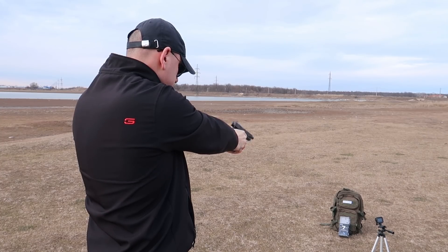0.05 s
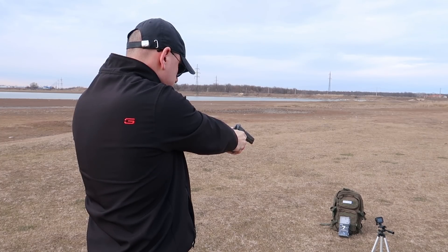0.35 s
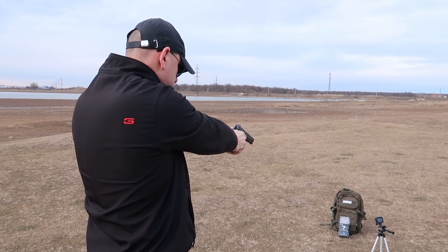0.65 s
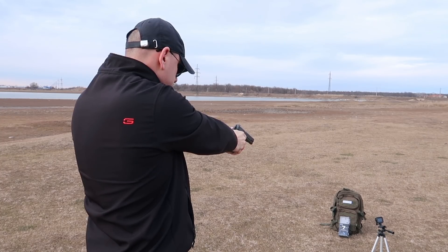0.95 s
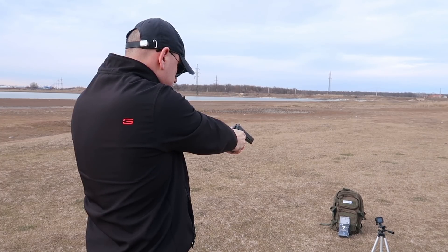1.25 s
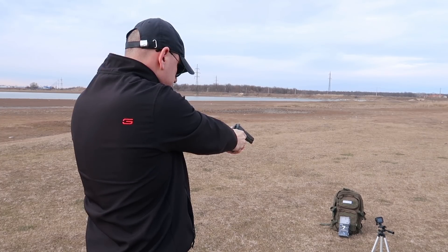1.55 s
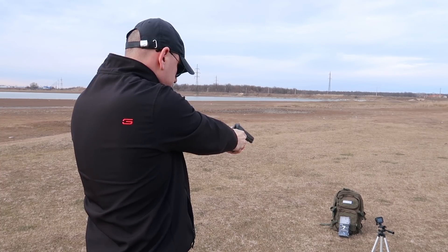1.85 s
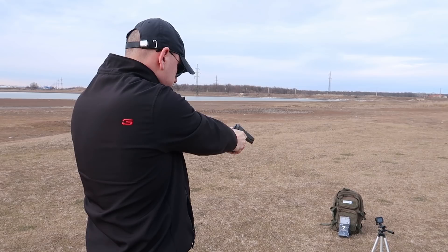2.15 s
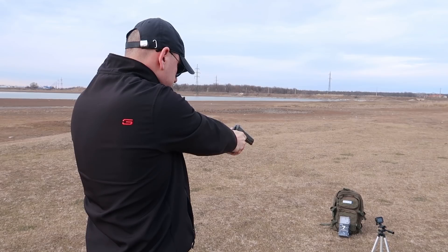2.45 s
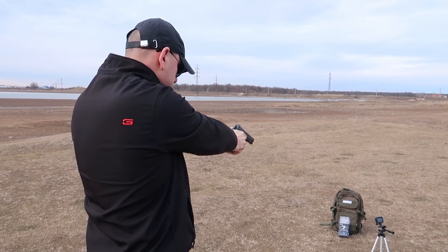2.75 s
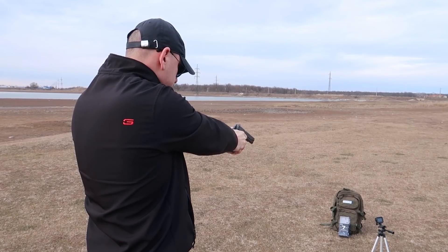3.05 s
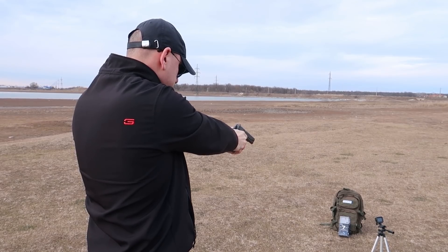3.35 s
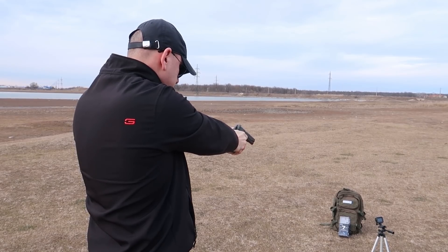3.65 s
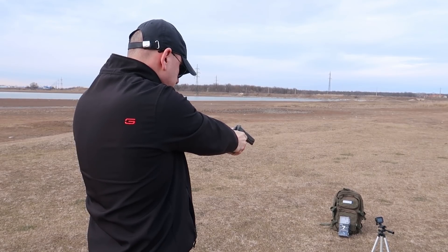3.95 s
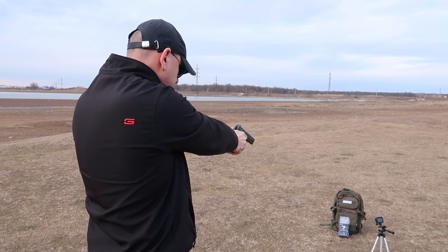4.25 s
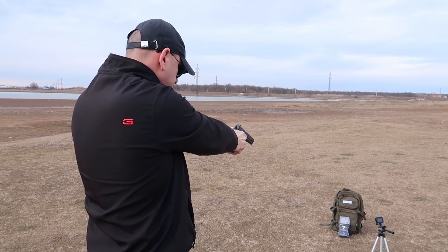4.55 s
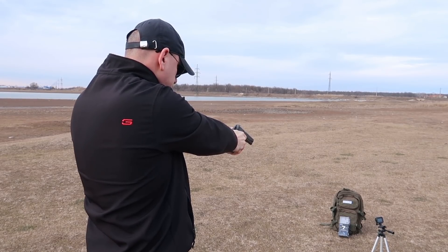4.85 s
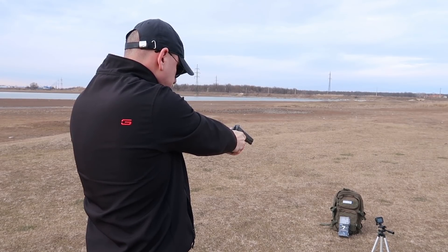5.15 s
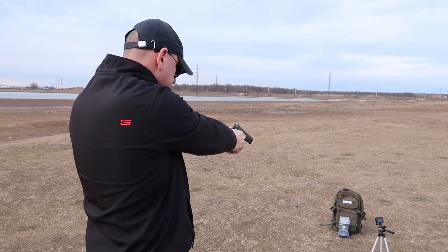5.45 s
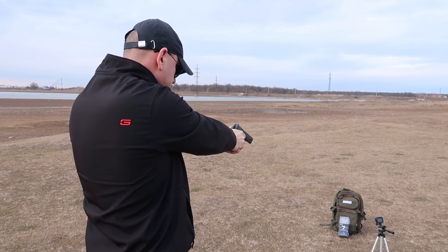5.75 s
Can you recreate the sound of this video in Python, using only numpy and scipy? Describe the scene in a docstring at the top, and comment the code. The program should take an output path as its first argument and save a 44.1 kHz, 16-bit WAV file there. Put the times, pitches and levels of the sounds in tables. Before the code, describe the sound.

Eight snappy airsoft pistol pops with slide clacks and some pellet smacks on a hollow target, in a gusty open field.

```python
"""A gas blowback airsoft pistol fires eight shots in an open field, two spaced apart, then a quicker string.
In each, released gas spits, the pellet leaves with a pop, and the slide racks back and slams shut.
The trigger clicks, and some pellets strike a hollow target and excite the modes of its walls.
The ground reflects every bang, turbulent gusts buffet the two ports of the microphone,
and a far background murmurs."""
import sys
import numpy as np
from scipy import signal
from scipy.fft import rfft, irfft
from scipy.io import wavfile
from scipy.ndimage import map_coordinates

SR = 44100
rng = np.random.default_rng(int(sys.argv[2]) if len(sys.argv) > 2 else 0)


def digitize_waveform(pressure):
    """Quantize a signal to 16-bit integers and store it at the path in sys.argv[1].

    Rows of a 2-D input are taken as channels; values are limited to [-1, 1].
    """
    field = np.atleast_2d(pressure).T
    bounded = np.clip(field, -1, 1)
    quanta = np.round(bounded * 32767).astype(np.int16)
    wavfile.write(sys.argv[1], SR, quanta)


N = 264600
BLOW_SIZE = 8192   # samples
AGE = np.arange(BLOW_SIZE) / SR   # seconds since a blow began

# Levels in the tables are relative: each source adds its own gain.
# shots: (pop time [s], pop level [dB], gas level [dB], hammer level [dB],
#         slide closing time [s], closing level [dB], level to which the background sinks [dB])
SHOTS = [(.1445, 1, -8.5, -5, .2003, -4.5, -80), (1.9238, 2, -12, 2.5, 1.9710, -9.5, -79.5),
         (3.0968, 0, -13, -3, 3.1497, -9.5, -80), (3.4965, -5, -21, -7, 3.5502, -5, -77),
         (3.8497, -4, -19, -6.5, 3.9038, -11.5, -82), (4.2213, -5.5, -23, -19, 4.2743, -7, -82),
         (5.0558, 0, -15, -5, 5.1090, -0.5, -76.5), (5.9182, 3, -12, -9, 5.9708, -1.5, -77)]
# trigger resets and grip clicks: (time [s], level [dB], ring frequency [Hz])
CLICKS = [(.432, -53.5, 4800), (.528, -33.5, 4200), (2.274, -31.5, 4170), (3.2688, -32, 2730),
          (3.6582, -29.5, 2750), (3.9949, -37.5, 2660), (4.358, -51, 1780), (4.389, -30.5, 2420),
          (4.4, -34, 2250), (4.7835, -38, 1800), (5.216, -54, 2700), (5.263, -27, 2700)]
# pellet strikes and rebounds on the target: (time [s], level [dB], ring level [dB], pitch [ratio])
HITS = [(.2225, 0, -5, 1.06), (1.9750, 0, 2.5, 1.02), (2.082, -52, -2, 0.9), (3.1402, 2.5, -1, 1.03),
        (3.1425, -8, -2.5, 0.97), (3.5750, -7, 3.5, 1.0), (3.8944, 4, -4, 1.04), (5.1412, -7, -2, 1.0),
        (5.1446, -9, 4.5, 1.08), (5.1628, -21, -3, 1.0)]
# normal modes: (frequency [Hz], level [dB], time to decay by 60 dB [s])
SLIDE_MODES = [(1420, -26, .032), (1960, -22, .032), (2700, -20, .026), (3200, -15, .028),
               (3650, -23, .026), (4760, -23, .026), (6500, -36, .025), (8160, -35, .022),
               (12400, -36, .025)]
TARGET_MODES = [(437, -19.5, 0.068), (650, -14, 0.03), (820, -20, 0.037), (978, -19, 0.049),
                (1710, -15.5, 0.036), (2250, -10.5, 0.031), (2770, -18.5, 0.0086)]
# spectra of the gas jet, muzzle pop and impacts: (frequency [Hz], spectral density [dB])
GAS_SPECTRUM = [(40, -28.5), (200, -6), (500, -7.5), (850, -5), (1200, -11.5), (2300, -5.5), (3300, -2),
                (4800, -6), (6000, -19.5), (8000, -27), (10200, -37.5), (12600, -22), (16000, -35.5)]
POP_SPECTRUM = [(30, -29), (120, -9), (300, -5.5), (700, -3.5), (1100, -6), (2100, 2.5), (3200, -2.5),
                (5500, -13.5), (7000, -19.5), (10200, -47), (12600, -23), (16000, -36)]
METAL_SPECTRUM = [(60, -38), (500, -27), (1100, -19.5), (1900, -8.5), (3200, -0.5), (4500, -8.5),
                  (5600, -18.5), (8000, -21.5), (10000, -51), (12500, -24), (16000, -35)]
TICK_SPECTRUM = [(100, -18), (600, -6), (1200, -11), (1900, -1.5), (2700, -0.5), (4400, -7), (6000, -17.5),
                 (10000, -36), (12500, -28), (16000, -43)]
SMACK_SPECTRUM = [(60, -38.5), (200, -35), (450, -14.5), (950, -1), (1230, -12.5), (1650, 0), (2300, -0.5),
                  (3400, -2.5), (4500, -14.5), (7000, -21.5), (10000, -42.5), (12500, -32), (16000, -43)]
# spectra of the wind bands, far wash and port hiss: (frequency [Hz], spectral density [dB])
RUMBLE_SPECTRUM = [(15, -19.5), (28, -10.5), (55, -4.5), (90, -2.5), (140, -5), (220, -15), (400, -40.5),
                   (900, -75.5)]
BUFFET_SPECTRUM = [(40, -29), (110, -10), (190, 1), (330, -2), (480, -10), (570, -24), (900, -48.5),
                   (2000, -76.5)]
FLUTTER_SPECTRUM = [(100, -25), (330, 2.5), (470, 1), (600, -6.5), (850, -10.5), (1250, -27), (1900, -45),
                    (4000, -74), (9000, -110)]
FAR_SPECTRUM = [(20, -28), (60, -16.5), (130, -6), (200, -1), (500, 0.5), (950, -1.5), (1300, -8.5),
                (2100, -18.5), (4000, -30.5), (8000, -46), (16000, -70)]
HISS_SPECTRUM = [(100, -1.5), (1500, 0), (4000, -2.5), (8000, -11.5), (11500, -17.5), (16000, -35.5)]
# lead of the left port for direct sound: (frequency [Hz], phase [rad])
PORT_PHASE = [(100, 0), (1200, -.03), (2300, -.07), (3400, -.18), (4400, -.45), (5400, -1.0), (6800, -.3),
              (8200, 1.0), (10000, -.5), (13000, .4), (16000, -.2)]
# difference between the two ports: (frequency [Hz], side minus mid level [dB])
SHOT_WIDTH = [(100, -25), (1000, -25), (2500, -23), (5000, -17), (8000, -9), (13000, -14)]
WIND_WIDTH = [(30, -17.5), (70, -11), (160, -7.5), (380, -5), (950, -0.5), (2400, 1.5)]
FAR_WIDTH = [(30, -27), (400, -24.5), (1000, -17), (2400, -8.5), (6000, -3)]
# light, unceasing breeze: (time [s], rumble level [dB], buffet level [dB])
BREEZE = [(0.0, -54.5, -57.5), (0.324, -47.5, -61.0), (0.861, -58.5, -72.0), (1.225, -50.0, -66.0),
          (1.784, -51.5, -62.5), (2.033, -44.0, -55.5), (2.332, -56.0, -68.0), (3.068, -48.0, -58.0),
          (3.668, -56.0, -65.5), (3.953, -49.5, -52.0), (4.307, -69.5, -72.5), (4.729, -67.5, -70.0),
          (4.943, -57.5, -64.5), (5.311, -70.0, -67.0), (5.576, -58.5, -70.5), (6.0, -49.5, -52.5)]
# gusts on the microphone: (time [s], hold [s], rumble level [dB], buffet level [dB])
GUSTS = [(.297, .018, -45.5, -55), (.524, .04, -42, -52), (.759, .017, -48.5, -59.5),
         (.935, .07, -38.5, -50.5), (1.11, .075, -37, -53), (1.515, .08, -26.5, -33.5),
         (1.842, .012, -26.5, -33), (1.885, .025, -27, -43), (1.95, .03, -37, -41), (2.12, .005, -40, -46),
         (2.177, .054, -38.5, -40.5), (2.57, .032, -35, -29.5), (2.69, .045, -32, -26),
         (2.80, .04, -36, -30.5), (2.87, .07, -39, -34), (3.025, .09, -38.5, -33), (3.23, .012, -41, -32.5),
         (3.385, .005, -57, -35.5), (3.44, .025, -42, -33.5), (3.682, .02, -43, -40),
         (3.975, .115, -44.5, -34), (4.165, .04, -48, -39), (4.786, .035, -48, -49),
         (5.71, .115, -42.5, -45)]
# single eddies bursting on the ports: (time [s], thump level [dB], flutter relative to thump [dB])
PUFFS = [(2.725, -28, -2), (2.78, -16.5, -8.5), (2.791, -17.5, -6), (3.033, -21, -25)]
# gain of the deep bass: (time [s], level [dB])
DEEP_BASS = [(0, 3), (2.4, -0.5), (3.1, -10.5), (5.1, -12), (6, -8)]

HAMMER_LEAD_S, GROUND_DELAY_S = .0064, .0059
TAKE_UP_LEAD_S, TAKE_UP_DB, TAKE_UP_HZ = .04, -42.5, 2650
GUST_RISE_DB_PER_S, GUST_FALL_DB_PER_S = 1000, 340
BACKGROUND_START_DB, BACKGROUND_FLOOR_DB = -63.5, -80
SINK_S, RECOVERY_DB_PER_S = .06, 9.8
DEEP_BASS_HZ, CUTOFF_HZ = 75, 16000


def pistol():
    """Sudden expansion of gas radiates a jet noise and a pop; impacts excite the modes of the slide."""
    out = np.zeros(N)
    pop_s = .014   # time of the pop within a shot
    for s, pop_db, gas_db, hammer_db, close_s, close_db, _ in SHOTS:
        shut_s = pop_s + close_s - s
        # the hammer opens the valve; flow builds, holds while the pellet is in the barrel, then vents
        flow_db = np.interp(AGE, [0, .003, .0055, .008, .014, .019, .05, .1],
                            [-42.5, -16, -.5, 1.5, -5.5, -13.5, -71.5, -140])
        shot = from_db(gas_db + flow_db) * colour(grains(spread_db=4), GAS_SPECTRUM)
        hammer = contact(METAL_SPECTRUM, chatter=.88, chatter_s=.0011)
        add(shot, pop_s - HAMMER_LEAD_S, from_db(hammer_db + 6.5) * hammer)
        # an all-pass filter shapes the pop into a brief compression and a deep rarefaction
        pop = signal.lfilter([.62, -1], [1, -.62], contact(POP_SPECTRUM, chatter=.09, chatter_s=.0015))
        add(shot, pop_s, from_db(pop_db + 13) * pop)
        # the slide meets its rear stop and scrapes along its rails
        rear = contact(METAL_SPECTRUM, chatter=.74, chatter_s=.0025)
        rear += from_db(.5) * ring(SLIDE_MODES, vary_db=4)
        add(shot, pop_s + .0095, from_db(.5 * pop_db - 7.5) * rear)
        rails = (AGE < close_s - s) * colour(grains(spread_db=4.5), METAL_SPECTRUM)
        add(shot, pop_s, from_db(-35 + .5 * pop_db - 78 * AGE) * rails)
        # the nozzle shoves the next pellet into the chamber just before the slide shuts
        shove = contact(METAL_SPECTRUM, chatter=.59, chatter_s=.002)
        add(shot, shut_s - .007, from_db(close_db - 21) * shove)
        seat = contact(METAL_SPECTRUM, chatter=.65, chatter_s=.0039)
        add(shot, shut_s - .002, from_db(close_db - 13) * seat)
        shut = contact(METAL_SPECTRUM, chatter=.24, chatter_s=.0048)
        shut += from_db(-6) * ring(SLIDE_MODES, vary_db=4)
        add(shot, shut_s, from_db(close_db + 4) * shut)
        add(out, s - pop_s, ground_reflection(shot, ground_db=-16, grass_db=-7.5, tail_db=-25))
    return out


def trigger():
    """Light impacts in the trigger and grip each excite one damped resonance."""
    out = np.zeros(N)
    # only in the quick string is the slack taken up briskly enough to tick
    take_ups = [(s - TAKE_UP_LEAD_S, TAKE_UP_DB, TAKE_UP_HZ) for s, *_ in SHOTS[2:]]
    for s, db, hz in take_ups + list(CLICKS):
        tick = contact(TICK_SPECTRUM, chatter=.24, chatter_s=.002)
        tick = tick / np.linalg.norm(tick) + ring([(hz, -23.5, .025)], vary_db=1)
        add(out, s, ground_reflection(from_db(db + 7) * tick, ground_db=-19.5, grass_db=-15, tail_db=-24))
    return out


def target():
    """Impact excitation: hollow walls ring and rattle, at a pitch set by where the pellet lands."""
    out = np.zeros(N)
    for s, db, ring_db, pitch in HITS:
        modes = [(hz * pitch, mode_db, t60) for hz, mode_db, t60 in TARGET_MODES]
        walls = from_db(ring_db - .5) * ring(modes, vary_db=1)
        rattle_envelope = from_db(ring_db - 23.5) * np.exp(-AGE / .0088)
        rattle = rattle_envelope * colour(grains(spread_db=4), SMACK_SPECTRUM)
        crack = 2.2 * contact(SMACK_SPECTRUM, chatter=.22, chatter_s=.0026)
        add(out, s, from_db(db) * (crack + walls + rattle))
    return out


def contact(spectrum, chatter, chatter_s):
    """Source and filter: an impulse of force and its dying chatter, shaped by a spectrum."""
    force = chatter * grains(spread_db=4) * np.exp(-AGE / chatter_s) * (1 - np.exp(-AGE / .00086))
    force[0] += 1
    return colour(force, spectrum)


def grains(spread_db):
    """Random amplitude modulation breaks noise into tiny uneven bursts; rms 1."""
    run = rng.standard_normal(BLOW_SIZE)
    run *= from_db(spread_db * np.repeat(rng.standard_normal(BLOW_SIZE // 32), 32))
    return run / run.std()


def ring(modes, vary_db):
    """Free vibration is a sum of damped sinusoids, a little different on every blow."""
    out = np.zeros(BLOW_SIZE)
    for hz, db, t60 in modes:
        amplitude = from_db(db + vary_db * rng.normal() - 60 * AGE / t60) * rng.choice([-1, 1])
        detuned_hz = hz * (1 + .015 * rng.normal())
        out += amplitude * np.sin(2 * np.pi * detuned_hz * AGE)
    return out


def ground_reflection(bang, ground_db, grass_db, tail_db):
    """Specular reflection adds one delayed copy; scattering adds a spray from the grass and a tail."""
    late = np.interp(AGE - GROUND_DELAY_S, AGE, bang, left=0)
    grass = from_db(grass_db) * scatter(late, decay_s=.0018)
    tail = from_db(tail_db) * scatter(late, decay_s=.0032)
    return bang + from_db(ground_db) * late + grass + tail


def scatter(x, decay_s):
    """Diffuse reflection: convolution with a dying spray of echoes of unit energy."""
    spray = rng.standard_normal(BLOW_SIZE) * np.exp(-AGE / decay_s)
    return signal.fftconvolve(x, spray / np.linalg.norm(spray))[:len(x)]


def microphone_ports(x):
    """Direct sound reaches the two ports with a phase difference; diffuse sound decorrelates them."""
    sides = np.array([[1], [-1]])
    direct = rfft(x) * np.exp(1j * at_hz(PORT_PHASE, N) * sides / 2)
    diffuse = rfft(scatter(x, decay_s=.004)) * from_db(at_hz(SHOT_WIDTH, N)) * sides
    return irfft(direct + diffuse, N)


def wind():
    """Turbulent pressure on the ports rumbles and buffets; stronger gusts break into brighter flutter."""
    rumble_db, buffet_db = wind_levels()
    thump, burst = puffs()
    lumps_db = 2.9 * eddies(per_s=75)
    rumble = from_db(rumble_db + .71 * lumps_db) * stereo_noise(RUMBLE_SPECTRUM, WIND_WIDTH)
    buffet_gain = np.hypot(from_db(buffet_db - .3 + lumps_db), thump)
    buffet = buffet_gain * stereo_noise(BUFFET_SPECTRUM, WIND_WIDTH)
    sharpness_db = np.clip(.61 * (buffet_db + 25) + 1.38 * (buffet_db - rumble_db) - 12, -35, -1.5)
    flutter_gain = np.hypot(from_db(buffet_db + sharpness_db + 1.3 * lumps_db), burst)
    flutter = flutter_gain * stereo_noise(FLUTTER_SPECTRUM, WIND_WIDTH)
    return rumble + buffet + flutter


def wind_levels():
    """Incoherent sources add in power: breeze plus gusts, as rumble and buffet levels in dB."""
    t = np.arange(N) / SR
    power = from_db(in_time(BREEZE)) ** 2
    for s, hold_s, rumble_db, buffet_db in GUSTS:
        fade_db = GUST_RISE_DB_PER_S * np.maximum(s - t, 0)
        fade_db += GUST_FALL_DB_PER_S * np.maximum(t - s - hold_s, 0)
        near = fade_db < 60
        power[:, near] += from_db(np.array([[rumble_db], [buffet_db]]) - fade_db[near]) ** 2
    return 10 * np.log10(power)


def puffs():
    """A single eddy is a brief swell of pressure: Gaussian envelopes for its thump and its flutter."""
    thump, flutter = np.zeros(N), np.zeros(N)
    centre_s = .03
    swell = np.exp(-((AGE - centre_s) / .0042) ** 2)
    for s, db, flutter_db in PUFFS:
        add(thump, s - centre_s, from_db(db) * swell)
        add(flutter, s - centre_s, from_db(db + flutter_db) * np.sqrt(swell))
    return thump, flutter


def eddies(per_s):
    """Turbulent fluctuation as a smooth random curve with a spread near 1."""
    knots = rng.standard_normal(4096)
    return map_coordinates(knots, [np.arange(N) / SR * per_s], order=3)


def background():
    """Ambient noise: a dull far wash and the ports' thin hiss sink at each shot and swell back."""
    t = np.arange(N) / SR
    level_db = BACKGROUND_START_DB + RECOVERY_DB_PER_S * t
    for s, *_, sunk_db in SHOTS:
        sunk = np.clip((t - s) / SINK_S, 0, 1)
        level_db = (1 - sunk) * level_db + sunk * (sunk_db + RECOVERY_DB_PER_S * (t - s))
    gain = np.hypot(from_db(level_db), from_db(BACKGROUND_FLOOR_DB))
    wash = from_db(9) * stereo_noise(FAR_SPECTRUM, FAR_WIDTH)
    hiss = from_db(-1) * stereo_noise(HISS_SPECTRUM, width=[(SR / 2, 0)])   # each port hisses on its own
    return gain * (wash + hiss)


def stereo_noise(spectrum, width):
    """Partial coherence: the ports share a mid noise and take a side noise with opposite signs."""
    mid = rfft(colour(rng.standard_normal(N + BLOW_SIZE), spectrum)[BLOW_SIZE:])
    side = rfft(colour(rng.standard_normal(N + BLOW_SIZE), spectrum)[BLOW_SIZE:])
    share = from_db(at_hz(width, N))
    return irfft((mid + share * side * np.array([[1], [-1]])) / np.hypot(1, share), N)


def colour(x, spectrum):
    """Minimum-phase filtering: convolution with a causal, unit-energy response of this spectrum."""
    cepstrum = irfft(np.log(from_db(at_hz(spectrum, BLOW_SIZE))))
    cepstrum[1:BLOW_SIZE // 2] *= 2
    cepstrum[BLOW_SIZE // 2 + 1:] = 0
    pulse = irfft(np.exp(rfft(cepstrum)))
    return signal.fftconvolve(x, pulse / np.linalg.norm(pulse))[:len(x)]


def from_db(db):
    """Decibels to amplitude ratio."""
    return 10 ** (np.asarray(db) / 20)


def in_time(rows):
    """Linear interpolation of a table's columns at every sample."""
    s, *columns = np.transpose(rows)
    return [np.interp(np.arange(N) / SR, s, column) for column in columns]


def at_hz(points, size):
    """Interpolation of a table over log frequency at the bins of an FFT."""
    hz, value = np.transpose(points)
    return np.interp(np.log(np.fft.rfftfreq(size, 1 / SR) + 1), np.log(hz), value)


def add(track, s, sound):
    """Superpose a sound on a track, starting at s seconds."""
    start = int(np.clip(round(s * SR), 0, len(track) - 1))
    track[start:start + len(sound)] += sound[:len(track) - start]


def scene():
    """Superposition of pistol, trigger, target, wind and background at the microphone."""
    return microphone_ports(pistol() + trigger() + target()) + wind() + background()


def record(dry):
    """A shelving filter thins the deep bass over time, saturation rounds peaks, a low-pass cuts the top."""
    bass_db, = in_time(DEEP_BASS)
    bass = signal.sosfiltfilt(signal.butter(1, DEEP_BASS_HZ, fs=SR, output="sos"), dry)
    thinned = dry + (from_db(bass_db) - 1) * bass
    rounded = thinned / (1 + (thinned / 1.02) ** 6) ** (1 / 6)
    return signal.sosfilt(signal.ellip(10, .1, 80, CUTOFF_HZ, fs=SR, output="sos"), rounded)


dry = scene()
out = record(dry)
digitize_waveform(out)
```